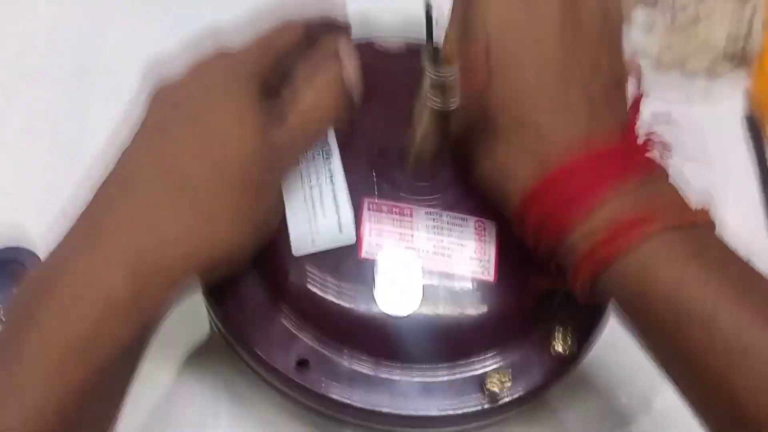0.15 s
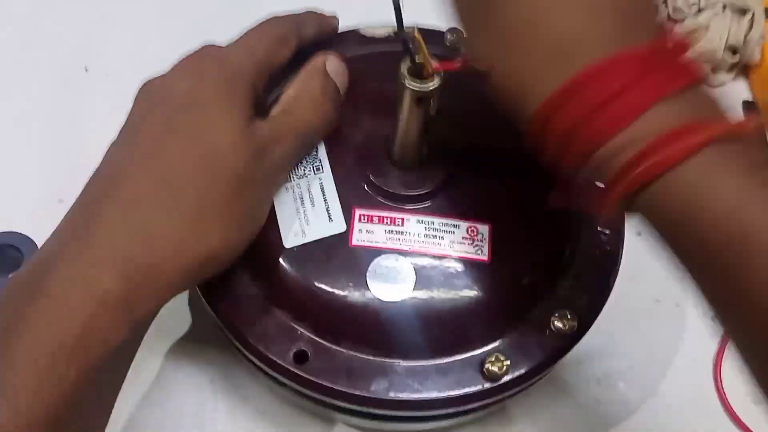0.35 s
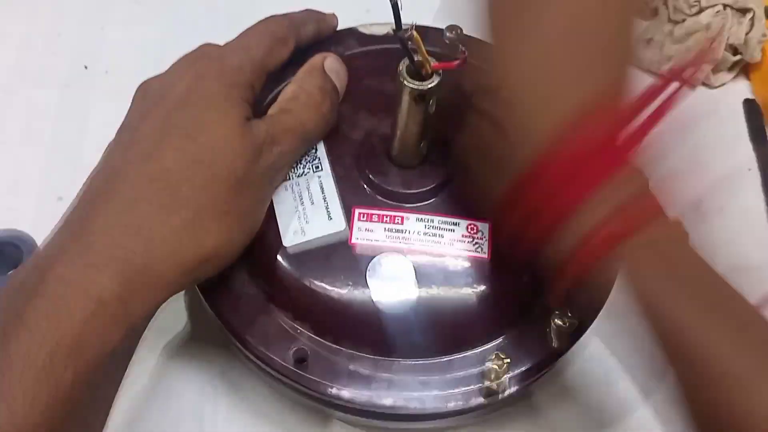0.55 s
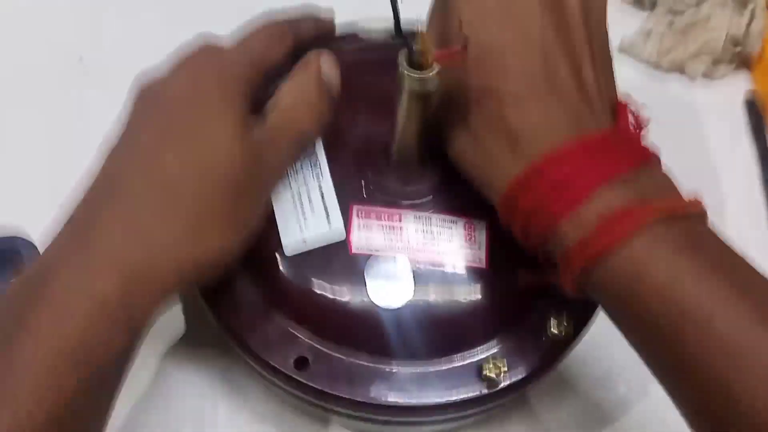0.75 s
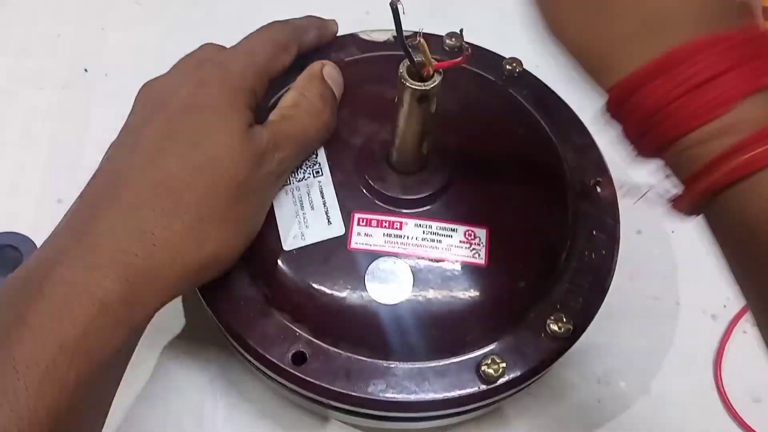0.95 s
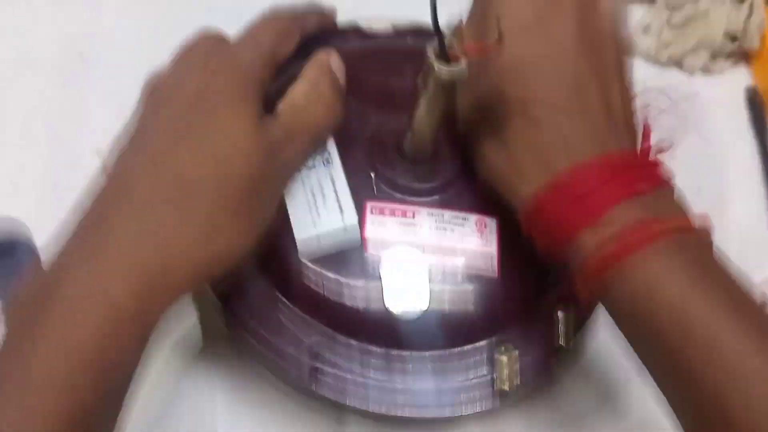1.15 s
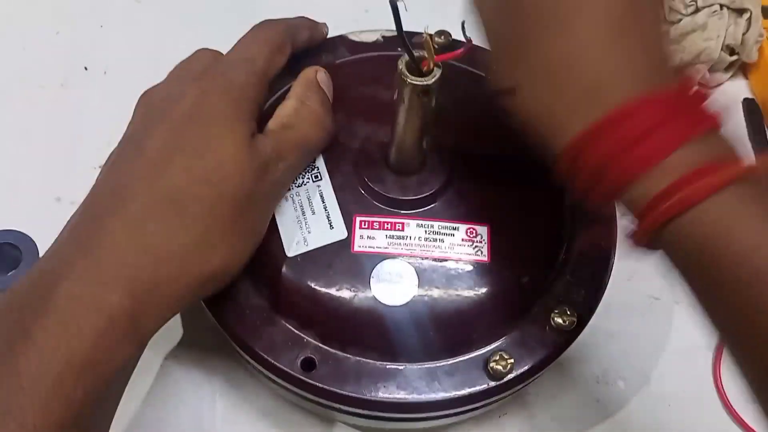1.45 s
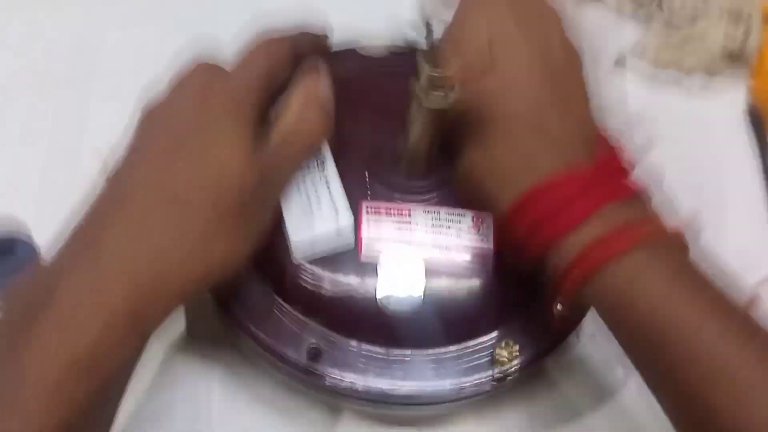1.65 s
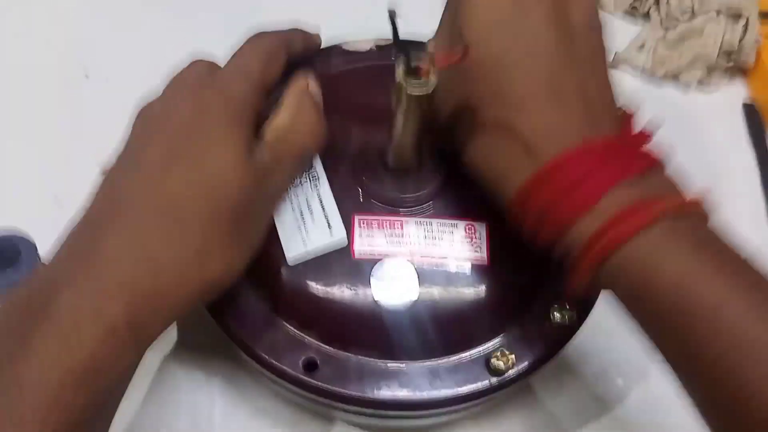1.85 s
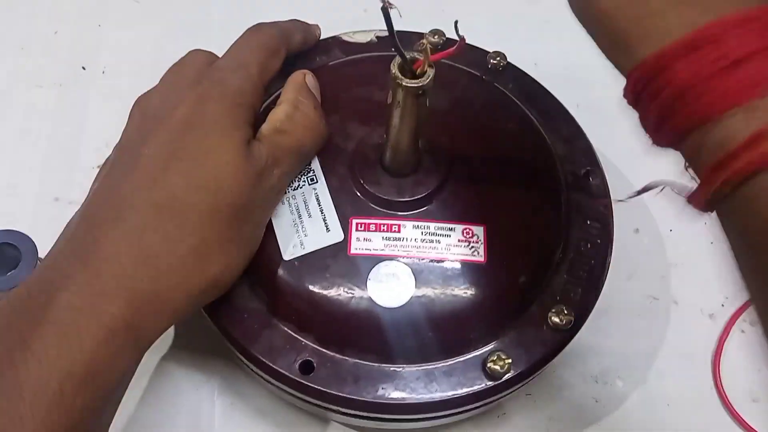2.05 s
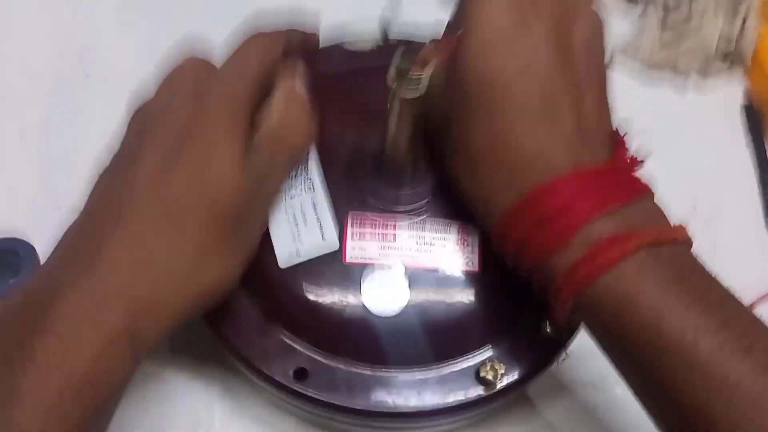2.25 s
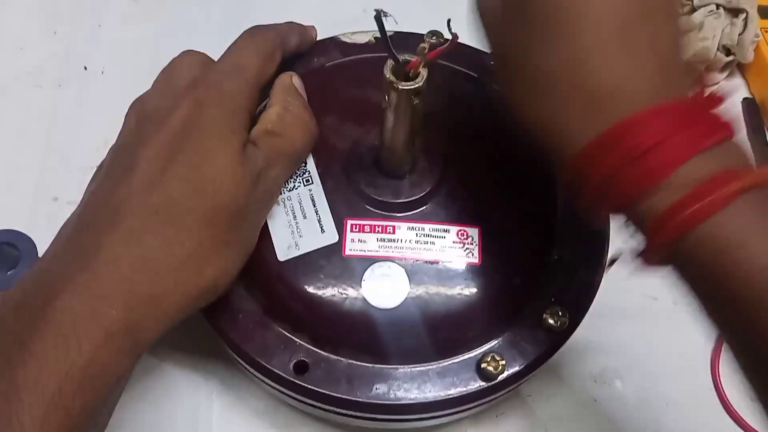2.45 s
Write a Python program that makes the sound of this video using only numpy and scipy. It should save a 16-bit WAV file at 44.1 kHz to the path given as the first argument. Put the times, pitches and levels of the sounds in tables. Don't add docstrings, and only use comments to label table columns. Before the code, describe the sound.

Hard metallic knocks as a fist pounds a steel fan motor cover on a bench, close up

```python
import sys
import numpy as np
from scipy import signal
from scipy.fft import rfft, irfft, next_fast_len
from scipy.io import wavfile
from scipy.ndimage import uniform_filter1d, minimum_filter1d, map_coordinates

SR = 44100
rng = np.random.default_rng(int(sys.argv[2]) if len(sys.argv) > 2 else 0)


def store_wav(level_fs):
    pcm = np.round(np.clip(np.atleast_2d(level_fs), -1, 1) * 32767)
    wavfile.write(sys.argv[1], SR, pcm.T.astype(np.int16))


def invert_db(level):
    return 10 ** (np.asarray(level, dtype=float) / 20)


N = 114660

# (frequency [Hz], level [dB])
MURMUR_TONE = [(25, -44), (100, -4), (205, -7), (300, -15.5), (700, -17.5), (1700, -33.5), (2200, -37),
               (8000, -42.5)]
# (time [s], level [dB])
MURMUR_LEVEL = [(0, -60.5), (.15, -73.5), (.6, -72.5), (1.0, -64.5), (1.7, -76), (2.05, -65.5),
                (2.2, -72.5), (2.6, -62)]
# (time [s], level [dB])
WHINE_LEVEL = [(0.0, -82), (0.25, -81), (0.36, -79), (1.58, -84), (2.48, -76), (2.6, -72)]
# (time [s], level [dB])
HUM_LEVEL = [(0, -60.5), (.17, -66.5), (.22, -71), (.55, -61), (.68, -72.5), (1.2, -80), (1.7, -82),
             (2.08, -57), (2.2, -71), (2.45, -54.5), (2.6, -66)]
# (time [s], level [dB], steel [dB], bench [dB], room [dB])
BLOWS = [
    (.217, -8, 1.5, 3.5, 3),
    (0.385, -25, 17, 9.5, -6),
    (.697, 1.5, -4.5, -17, 0),
    (1.211, -11, 4, 0.5, 8),
    (1.742, -3, 0, 1, 3),
    (2.242, -4.5, -0.5, 0, 4),
]
# (knock [Hz], upper knock [Hz], seating time [s], rim ring [Hz], rim level [dB])
SPOTS = [
    (594, 1000, .0032, 1400, -8),
    (580, 2500, 0.021, 4150, 3.5),
    (540, 770, .0021, 12000, -10.5),
    (616, 925, .0043, 2500, -13.5),
    (573, 1060, 0.009, 3450, -1),
    (605, 1091, 0.00543, 3600, 0),
]
# (time [s], level [dB], length [s], steel [dB], bench [dB])
ROCKS = [
    (0.256, -24, .01, -15, -2),
    (.283, -27.5, .01, -1, -10),
    (.733, -16.5, 0.034, -7, 5),
    (1.243, -25.5, 0.026, -15, -3),
    (1.287, -41, .02, -19, 3),
    (1.787, -26, .02, 4.5, 13),
    (2.29, -32.5, 0.015, 15.5, 8.5),
    (2.375, -39, 0.011, 12.5, 15.5),
]
# (frequency [Hz], width [Hz], level [dB])
COVER_MODES = [(660, 87, 4), (1315, 40, -14), (1589, 76, -2), (1882, 100, -2), (2270, 30, -5.5),
               (2600, 310, -15.5), (3980, 210, -7), (4120, 40, -4.5), (5300, 300, -6.5), (5623, 67, -4.5),
               (6200, 61, -14.5)]
# (frequency [Hz], level [dB])
CRACK_TONE = [(60, -38.5), (500, 1), (1480, -13), (3620, -12), (6500, -14.5), (8000, -24.5), (13500, -24),
              (16000, -45)]
# (frequency [Hz], width [Hz], level [dB])
BENCH_MODES = [(106, 30, -2.5), (179.7, 18, 3), (207.3, 20, -2.5), (319, 100, -8.5)]
# (frequency [Hz], time [s])
ROOM_T60 = [(100, 0.36), (250, 0.49), (600, 0.4), (1500, 0.34), (4000, 0.32), (7000, 0.28),
            (10000, .27), (13000, .22), (15000, .2)]
# (frequency [Hz], level [dB])
ROOM_COLOUR = [(100, -1.5), (500, -9.5), (2000, 1.5), (6000, -4), (15000, -5.5)]
# (time [s], level [dB], pitch [Hz], length [s], scatter [0-3, more is noisier])
TICKS = [(0.939, -67, 1780, .02, 0.19), (1.013, -78.5, 1780, 0.048, 0.2), (1.088, -78, 1400, 0.029, 0),
         (1.04, -77, 3780, 0.042, 0.9), (1.161, -69.5, 322.4, .04, .05), (1.44, -58.5, 6150, 0.027, .8),
         (1.8, -71, 1710, 0.067, 0.6), (0.49, -59.5, 1780, 0.026, 0.14), (1.518, -68, 1760, 0.032, 0.09),
         (1.656, -75, 1612, .04, 0.5), (1.95, -68.5, 6300, .015, 0.08), (2.042, -87, 1343, 0.034, 0.1),
         (2.16, -73, 1780, 0.019, 0), (2.443, -62, 6000, 0.0087, 0.6), (2.562, -72.5, 1745, .03, 0.04),
         (2.576, -74, 13500, .005, 3), (4.1, -96, 13500, .005, 2.97), (0.91, -83, 8000, .008, 3),
         (2.45, -84, 13500, .005, 3), (1.6, -75.5, 1400, 0.067, .9)]
# (multiple of its pitch [-], level [dB])
HORN_OVERTONES = [(1, -10), (2, -2), (3, -10), (4, -11), (5, -20), (6, -19), (7, -28), (8, -20), (9, -27),
                  (11, -29), (13, -27)]
# (frequency [Hz], width [Hz], lift [dB])
PORT = [(9900, 900, 10), (15000, 700, 19)]

WHINE_HZ, WHINE_WIDTH_HZ = 9950, 900
HUM_HZ, HUM_WIDTH_HZ, HISS_DB = 221, 75, -99
PATCHY_DB = 3
RISE_S = .005
CONTACTS_PER_S, SIZE_DB = 7000, 3
BLOW_RATTLE, ROCK_RATTLE = .3, .97
SEAT_SHARE = .7
FIST_HZ = 1350
KNOCK_DB, KNOCK_WIDTH_HZ, UPPER_DB, KNOCK_SEND_DB = 9, 130, 3, -8
MIDDLE, MIDDLE_DB = 1.24, -3
STEEL_DB, CRACK_DB, MODE_SCATTER_DB, RIM_WIDTH_HZ = -5, -2.5, 2, 120
BENCH_DB, BENCH_CUT_HZ, THUMP_S = 12.5, 94, 0.00053
ROOM_DB = -5
HORN_S, HORN_END_S, HORN_RISE_S, HORN_HZ, HORN_DB = .6, .72, .03, 435, -63
TOP_HZ = 15550
LIMIT_DB, SQUEEZE, RELEASE_DB_PER_S, AHEAD_S = -6, .9, 1200, .0015


def along(points, hz):
    f, v = np.transpose(points)
    return np.interp(np.log(hz + 1), np.log(f + 1), v)


def unit(x):
    return x / np.sqrt(np.mean(x ** 2) + 1e-20)


def curve(rows):
    return np.interp(np.arange(N) / SR, *np.transpose(rows))


def wobble(rate):
    knots = rng.standard_normal(int(N * rate / SR) + 4)
    return map_coordinates(knots, [np.arange(N) * rate / SR])


def filtered(x, response):
    m = next_fast_len(len(x) + 8192)
    hz = np.fft.rfftfreq(m, 1 / SR)
    return irfft(rfft(x, m) * response(hz), m)[:len(x)]


def noise_band(n, hz, width):
    return unit(filtered(rng.standard_normal(n), lambda f: np.exp(-((f - hz) / width) ** 2)))


def resonant(f, peaks):
    total = 0
    for k, (c, w, db) in enumerate(peaks):
        total = total + (-1) ** k * invert_db(db) * 1j * f * w / (c * c - f * f + 1j * f * w)
    return total


def causal(gain):
    c = irfft(np.log(gain + 1e-6))
    half = len(c) // 2
    c[1:half] *= 2
    c[half + 1:] = 0
    return np.exp(rfft(c))[:len(gain)]


def add(x, s, piece):
    i = round(s * SR)
    x[i:i + len(piece)] += piece[:N - i]


def background():
    z = signal.stft(rng.standard_normal(N), nperseg=1024)[2]
    field = uniform_filter1d(uniform_filter1d(rng.standard_normal(z.shape), 3, 0), 5, 1)
    patchy = signal.istft(z * invert_db(PATCHY_DB * unit(field)), nperseg=1024)[1][:N]
    murmur = unit(filtered(patchy, lambda f: invert_db(along(MURMUR_TONE, f)) * (f < 8000)))
    whine = noise_band(N, WHINE_HZ, WHINE_WIDTH_HZ)
    murmur_db = curve(MURMUR_LEVEL) + 0.67 * wobble(12)
    whine_db = curve(WHINE_LEVEL) - 4 + 1.5 * wobble(45)
    return invert_db(murmur_db) * murmur + invert_db(whine_db) * whine


def hum():
    note = noise_band(N, HUM_HZ, HUM_WIDTH_HZ)
    return invert_db(curve(HUM_LEVEL)) * note + invert_db(HISS_DB) * rng.standard_normal(N)


def room(x):
    hz, t, z = signal.stft(rng.standard_normal(SR * 3 // 4), SR, nperseg=256)
    decay_db = -60 * t / along(ROOM_T60, hz)[:, None]
    fading = z * invert_db(along(ROOM_COLOUR, hz)[:, None] + decay_db)
    tail = signal.istft(fading, SR, nperseg=256)[1]
    tail = invert_db(ROOM_DB) * tail / np.sqrt(SR * 0.019) / 0.92
    delayed = np.pad(x, (220, SR // 2))
    return signal.fftconvolve(delayed, tail)[:len(x) + SR // 2]


def contact(db, steel_db, bench_db, room_db, spot, rise_s, rattle):
    knock_hz, upper_hz, fall_s, rim_hz, rim_db = spot
    t = np.arange(SR // 4) / SR
    shape = np.where(t < rise_s, (t / rise_s) ** 3, np.exp(-(t - rise_s) / fall_s))
    chance, side = rng.random((2, len(t)))
    hits = (chance < CONTACTS_PER_S / SR) * np.sign(side - .5)
    clatter = shape * hits * invert_db(SIZE_DB * rng.standard_normal(len(t)))
    clatter /= np.linalg.norm(clatter) + 1e-9
    push = 1. * (np.arange(len(t)) == round(rise_s * SR))
    seated = push + SEAT_SHARE * np.roll(push, round(fall_s * SR))

    scatter = MODE_SCATTER_DB * rng.standard_normal(len(COVER_MODES))
    modes = [(c, w, d + j) for (c, w, d), j in zip(COVER_MODES, scatter)]
    knocks = [(knock_hz, KNOCK_WIDTH_HZ, 0), (MIDDLE * knock_hz, KNOCK_WIDTH_HZ, MIDDLE_DB),
              (upper_hz, KNOCK_WIDTH_HZ, UPPER_DB)]

    def shell(f):
        soft_fist = FIST_HZ ** 2 / (FIST_HZ ** 2 - f * f + 1.4j * f * FIST_HZ)
        return invert_db(KNOCK_DB) * resonant(f, knocks) * soft_fist

    def metal(f):
        rim = invert_db(STEEL_DB + steel_db) * resonant(f, [(rim_hz, RIM_WIDTH_HZ, rim_db)])
        ringing = invert_db(STEEL_DB) * abs(resonant(f, modes))
        crack = invert_db(CRACK_DB + along(CRACK_TONE, f))
        return invert_db(steel_db) * causal(np.hypot(ringing, crack)) + rim

    def bench(f):
        low_cut = (1j * f / (BENCH_CUT_HZ + 1j * f)) ** 2
        soft_thump = (1 + 2j * np.pi * f * THUMP_S) ** 2
        return invert_db(BENCH_DB + bench_db) * resonant(f, BENCH_MODES) * low_cut / soft_thump

    direct = filtered((1 - rattle) * seated + rattle * clatter, shell)
    direct = direct + filtered(clatter, metal) + filtered(push, bench)
    source = push if rattle < .5 else clatter
    sent = filtered(source, lambda f: invert_db(KNOCK_SEND_DB) * shell(f) + metal(f) + bench(f))
    sound = invert_db(room_db) * room(sent)
    sound[:len(direct)] += direct
    return invert_db(db + 28) * sound


def cover():
    x = np.zeros(N)
    for (s, *levels), spot in zip(BLOWS, SPOTS):
        add(x, s - RISE_S, contact(*levels, spot, RISE_S, BLOW_RATTLE))
    for s, db, length, steel_db, bench_db in ROCKS:
        spot = (560, 980, length, 3500, -4)
        add(x, s, contact(db, steel_db, bench_db, 0, spot, 0.39 * length, ROCK_RATTLE))
    return x


def ticks():
    x = np.zeros(N)
    t = np.arange(SR // 5) / SR
    for s, db, hz, length, scatter in TICKS:
        tone = noise_band(len(t), hz, 40 + 600 * abs(scatter))
        swell = 2 * (t / length) * np.exp(-2.2 * t / length)
        add(x, s, invert_db(db + 12) * tone * swell)
    return x


def horn():
    t = np.arange(N) / SR
    rise = np.clip((t - HORN_S) / HORN_RISE_S, 0, 1)
    fall = np.clip((HORN_END_S - t) / .02, 0, 1)
    phase = 2 * np.pi * np.cumsum(HORN_HZ * (1 + .003 * wobble(25))) / SR
    tone = sum(invert_db(db + 5.1 * wobble(36)) * np.sin(k * phase + k * k) for k, db in HORN_OVERTONES)
    return invert_db(HORN_DB) * rise * fall * tone


def scene():
    return (background() + hum() + cover() + ticks() + horn())[None]


def low_pass(x):
    return signal.sosfilt(signal.butter(12, 16800, fs=SR, output="sos"), x)


def record(dry):
    def microphone(f):
        lift_db = sum(db / (1 + (2 * (f - c) / w) ** 2) for c, w, db in PORT)
        return causal(invert_db(lift_db) / (1 + (f / TOP_HZ) ** 80))

    x = filtered(dry[0], microphone)
    ramp = RELEASE_DB_PER_S * np.arange(N) / SR
    held = np.maximum.accumulate(20 * np.log10(np.abs(x) + 1e-9) + ramp) - ramp
    cut_db = -SQUEEZE * np.maximum(held - LIMIT_DB, 0)
    n = round(AHEAD_S * SR)
    cut_db = uniform_filter1d(minimum_filter1d(cut_db, n), n)
    mix = (x * invert_db(cut_db))[None]
    return low_pass(mix)


dry = scene()
out = record(dry)
store_wav(out)
```